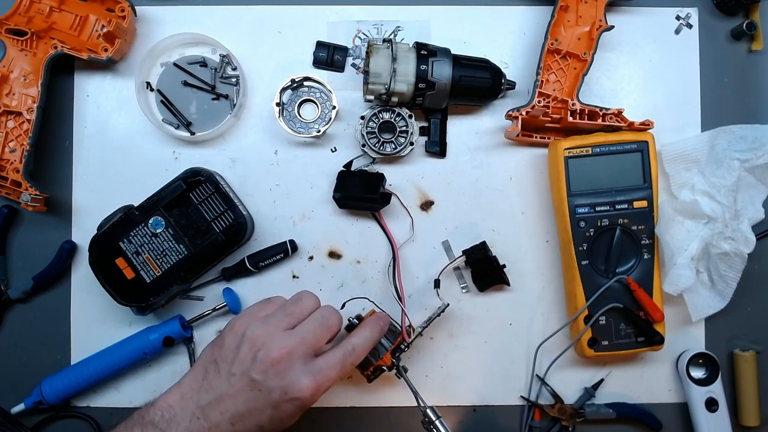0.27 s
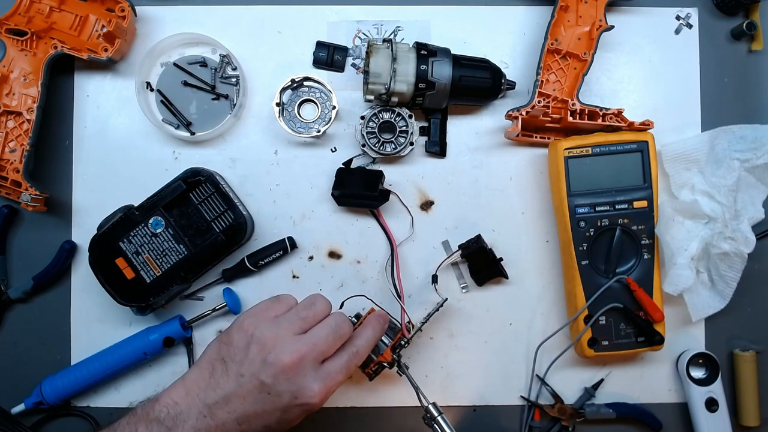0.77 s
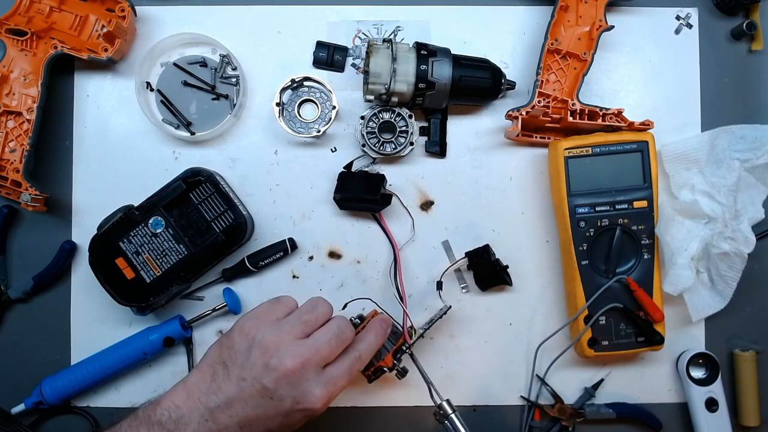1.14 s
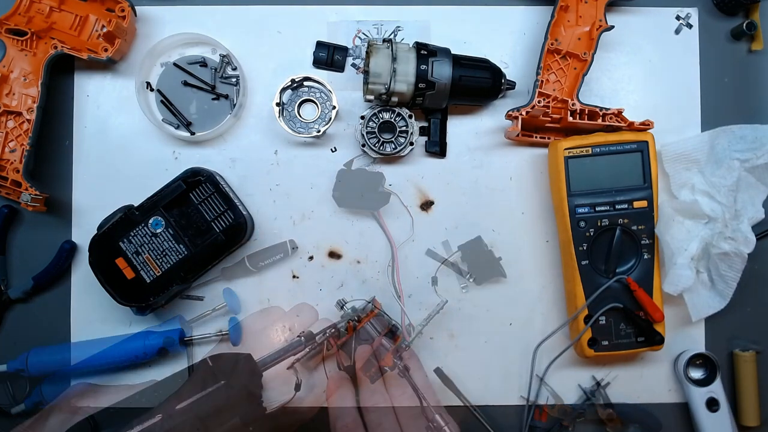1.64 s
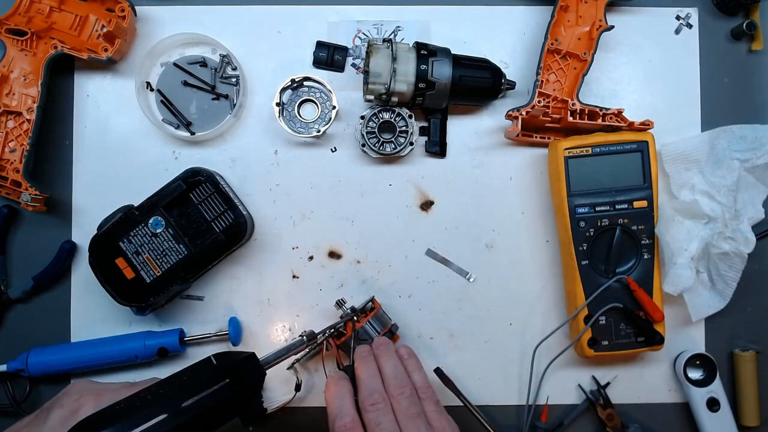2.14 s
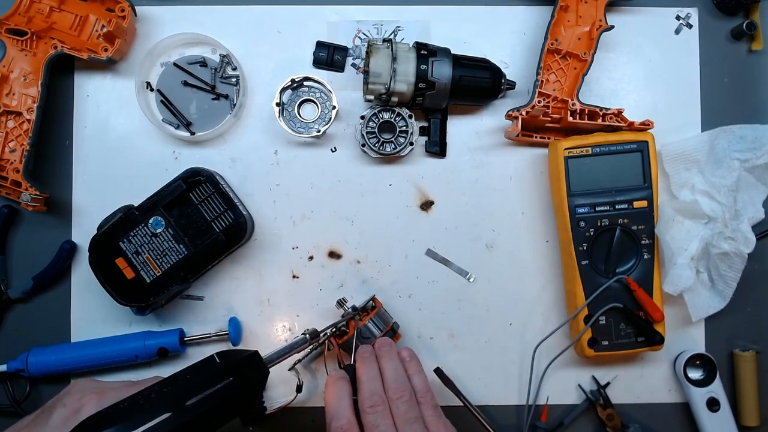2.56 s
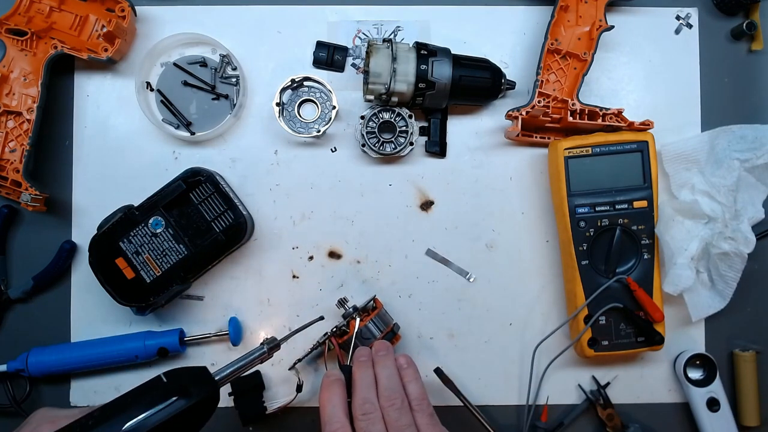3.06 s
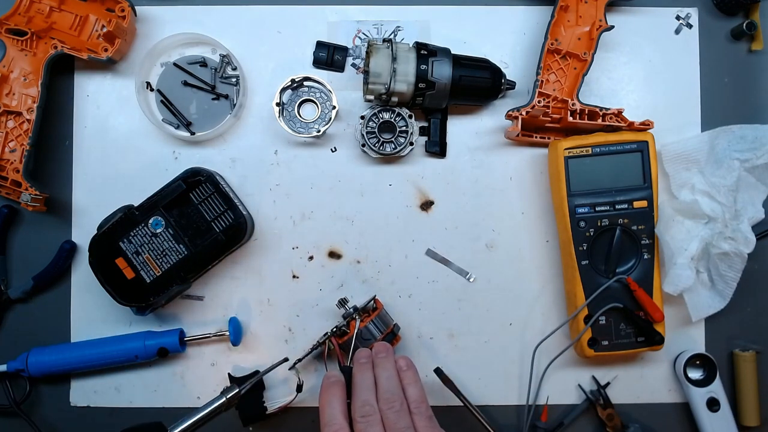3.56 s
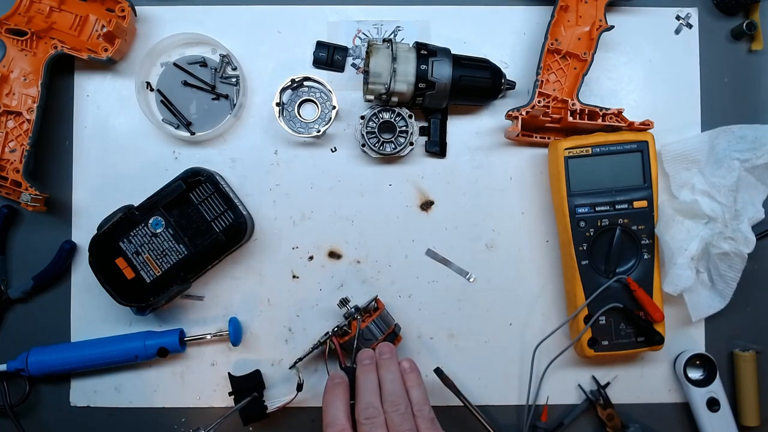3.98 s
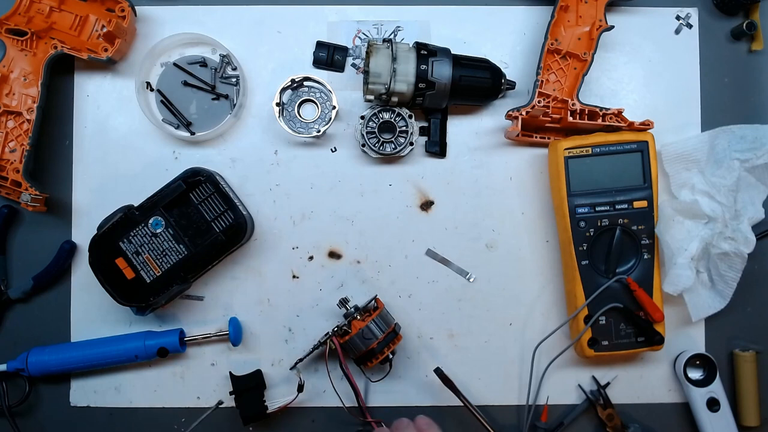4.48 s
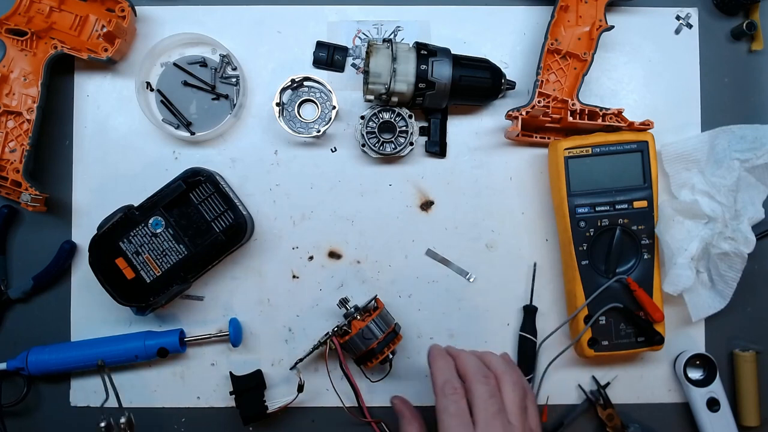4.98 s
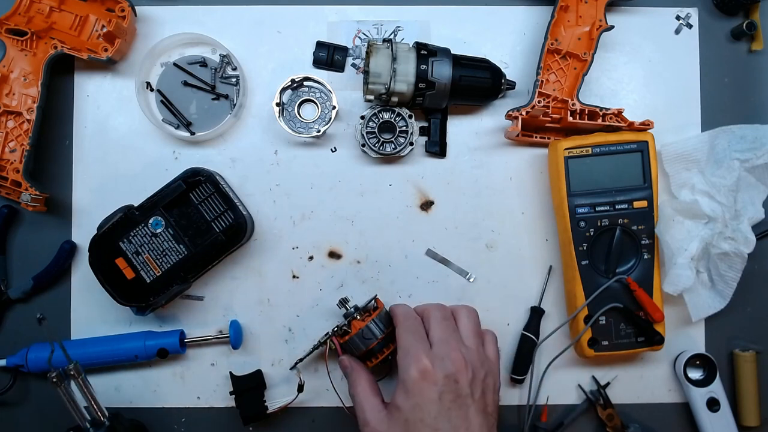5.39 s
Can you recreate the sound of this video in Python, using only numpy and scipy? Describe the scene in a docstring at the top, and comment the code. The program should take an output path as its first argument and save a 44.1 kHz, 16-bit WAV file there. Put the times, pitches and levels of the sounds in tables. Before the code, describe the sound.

A close, nearly centred stereo pickup above a workbench in a small, briefly reverberant workshop. Quiet room air and a wandering low rumble run throughout, with a very faint high whine that drops at 1.7 s. A slight slide opens; small tools click on a metal motor part at 0.25 s, fainter at 0.35 and 0.65, then brighter with a light knock near 1.0. Two soft dull knocks come at 1.8, and a click with short squeaky slides around 2.1. It is mostly quiet from 2.4 to 4.0, then a soft scrape leads to a crisp double click at 4.26-4.29. At 4.61 a short rush ends in a hard, loud slam with rapid bounces, brief ringing and weakening knocks. A small tap follows at 4.87, then heavy, low bench booms at 5.14 and 5.38-5.42 with clatter and clicks, ending in a scraping slide near 5.6.

```python
"""Work with small tools at a bench in a small workshop, heard by two spaced microphones above the bench.
Filtered noise gives room air and rumble, sines a thin whine that drops at 1.67 s; hands slide things (resonant noise).
Soon small tools click on a metal motor part (noise bursts, damped modes) and light knocks bend the bench.
At 4.61 s a heavy tool is set down: a short rush of noise, a hard slam with quick bounces, later weaker knocks.
Then more tools are put down and the bench top booms (damped modes, clatter), with more clicks and a last slide."""
import sys
import numpy as np
from scipy import signal
from scipy.fft import rfft, irfft
from scipy.io import wavfile

SR = 44100
rng = np.random.default_rng(int(sys.argv[2]) if len(sys.argv) > 2 else 0)


def store_wav(level_fs):
    """Save 16-bit WAV to argv[1]."""
    pcm = np.round(np.clip(np.atleast_2d(level_fs), -1, 1) * 32767)
    wavfile.write(sys.argv[1], SR, pcm.T.astype(np.int16))


N = 248283
TIME = np.arange(N) / SR
AGE = TIME[:SR // 2]  # time since a blow, s

# room air: pitch_hz, relative density_db (per Hz)
AIR_SHAPE = [(12, -25.5), (20, 2), (53, -9.5), (77, -25.5), (110, -14), (134, -18.5), (216, -23),
             (262, -19), (574, -26), (897, -33), (976, -33.5), (2140, -37.5), (3250, -44), (6540, -48.5),
             (16000, -69)]
# low rumble, level over time: time_s, level_db (before its wander)
RUMBLE_LEVEL = [(0, -57), (1.0, -58), (1.4, -70), (2.1, -57.5), (2.6, -55), (3.4, -69.5), (4.0, -57.5)]
# low rumble, tone: pitch_hz, relative level_db
RUMBLE_SHAPE = [(15, -6.5), (30, 3.0), (60, -1.0), (105, -4.5), (160, -20), (400, -52), (1500, -78.5)]
# electrical whine: pitch_hz, level_db (at the start)
WHINE_LINES = [(8000, -86), (12000, -97)]
# things slid over the bench, squeaking when the resonance is narrow:
# middle_s, length_s, level_db, resonance_hz, nominal width_hz
SLIDE_STROKES = [(0.012, 0.091, -54, 1110, 438), (1.578, 0.12, -57, 466, 33.2),
                 (1.796, 0.048, -61.5, 1720, 180), (2.122, 0.072, -53.5, 673, 120),
                 (2.15, 0.058, -49, 1045, 74.6), (2.353, 0.06, -70.5, 2100, 900),
                 (3.6, 0.3, -78, 2000, 1210), (4.04, 0.26, -58.5, 690, 480),
                 (4.11, 0.17, -51.5, 296, 129.5), (4.529, 0.21, -60.5, 948, 200),
                 (4.879, .018, -43, 850, 350), (5.021, .12, -54, 1034, 200.3), (5.282, 0.34, -57, 990, 600),
                 (5.45, 0.5, -62, 2600, 1300), (5.62, 0.16, -46.5, 1060, 424)]
# the workshop's reverberation: pitch_hz, level_db, t60_s
ROOM_TAIL = [(98.6, -11, 0.17), (297, -4, 0.21), (1000, -3.5, 0.35), (2540, -6, 0.31), (5470, -5.5, 0.31),
             (13800, -11, 0.27)]
# small tools touching: start_s, level_db, middle_ring_hz, low_ring_hz,
# low_ring_db and crack_db (both relative to level_db, before the layer trims)
TOOL_TOUCHES = [(0.121, -73, 1810, 1220, 6, 13), (0.251, -28, 2040, 1220, -3, -3.5),
                (0.336, -43, 2350, 1000, -4, 5.5), (0.651, -50.5, 1660, 930, -16, -3.5),
                (0.974, -23.5, 2056, 1137, -9, -13.5), (0.988, -37.5, 1470, 940, 2.5, 7),
                (1.048, -58, 1610, 1000, -10, 13), (2.105, -32, 1680, 1050, -6.5, .5),
                (2.702, -54, 1330, 1090, 4, -12), (4.096, -45, 1390, 975, -4, -1),
                (4.259, -19.5, 1420, 1250, -15, -4.5), (4.288, -17, 1385, 1300, -23, -1),
                (4.975, -53, 1680, 1024, 13, -11), (5.066, -40, 1646, 1060, -19.5, -11),
                (5.125, -45.5, 1580, 1110, 8.5, 0.5), (5.143, -27.5, 1640, 840, -5, -1),
                (5.367, -31.5, 1730, 1074, -3, -16), (5.376, -33, 1610, 983, .5, -8.5),
                (5.420, -28, 1410, 870, -4, -6.5)]
# where the hands work: time_s, right_lead_ms (how much earlier the right microphone hears it)
HAND_PLACE = [(0, -0.042), (1, -0.015), (2.1, 0.029), (4.2, 0.059), (5.6, 0.064)]
# what every small contact rings with: pitch_hz, relative level_db
CLACK_SHAPE = [(200, -18), (700, -8.5), (950, -1.5), (1400, -6.5), (2150, 0), (2800, -3.5), (5000, -14.5),
               (12000, -30.5)]
# sharp edge of a touch, also the scratch of a slide: pitch_hz, relative level_db
TOUCH_CRACK_SHAPE = [(600, -40.5), (2200, -16.5), (3000, -0.5), (3700, 1.5), (4600, -1.5), (5600, -4.5),
                     (7000, -9), (8500, -15), (10000, -16), (12500, -20), (15500, -27)]
# the metal motor part and the tool against it: pitch_hz (before detuning), relative level_db, t60_s
METAL_MODES = [(1029.6, 0.5, 0.16), (1090, -5, 0.07), (1304, -3.5, 0.042), (1420, -3, 0.098),
               (1546, -5.5, 0.12), (1710, -6.5, 0.24), (1999, -3.5, 0.024), (2190, -7.5, 0.051),
               (2726, -13, 0.25), (2900, -11, .08), (3840, -7.5, 0.098), (4400, -14, 0.09),
               (4960, -12.5, 0.07), (5450, -11, 0.057), (5830, -11.5, 0.069), (6400, -17, 0.078)]
# blows on the bench top: start_s, level_db, contact_ms
BENCH_BLOWS = [(0.253, -44, 2.9), (0.986, -33, 3.77), (1.787, -33.5, 5.4), (1.805, -33, 4.1),
               (2.105, -35.5, 3.8), (4.289, -43, 2), (4.873, -36, .5), (5.142, -11, 1.92), (5.149, -5, 3.4),
               (5.384, -0.5, 10.25), (5.419, -5.5, 1.69)]
# bench top modes: pitch_hz, relative level_db, t60_s
BENCH_MODES = [(36, -14, 0.33), (50, -7.5, 0.12), (111.6, -0.5, 0.15), (118, -18, 0.046), (162, -13, 0.24),
               (190, -11, 0.13), (226.7, -6, 0.2), (279.3, -8.5, 0.13), (327.8, -7.5, 0.15),
               (378.6, -13.5, 0.22), (445, -19.5, 0.23), (531.6, -16.5, .18), (560, -25, 0.14),
               (674, -19.5, 0.1)]
# loose things clattering on the bench: pitch_hz, relative level_db
CLATTER_SHAPE = [(30, -20.5), (90, -6.5), (250, -5), (400, -6.5), (700, -4.5), (1200, -11), (2000, -19.5),
                 (4000, -32)]
# ringing body of the heavy tool: pitch_hz, relative level_db, t60_s
HEAVY_MODES = [(323, -11, .18), (404, -17, .2), (528, -12, .2), (775, -7, .1), (803, 0, .15),
               (950, -6, .08), (992, 1, .15), (1100, -10, .22), (1255, -7, .2), (1408, -2, .17),
               (1585, -6, .2), (1705, -7, .16), (1772, -9, .18), (1961, -6, .16), (2100, -9, .16),
               (2820, -17, .12), (5730, -21, .16), (6050, -20, .15), (7040, -23, .16)]
# dull noise of the heavy tool's rush and blows: pitch_hz, relative level_db
HEAVY_BODY_SHAPE = [(80, -16), (230, -2), (450, -5.5), (750, -0.5), (1100, -2.5), (1600, -4), (2200, -11.5),
                    (3500, -22.5), (7000, -37.5), (15000, -44)]
# sharp crack of the heavy tool's blows: pitch_hz, relative level_db
HEAVY_CRACK_SHAPE = [(800, -9), (2500, 10), (4200, 2), (5600, 9.5), (7000, 6), (8300, -5), (10500, 1.5),
                     (13000, -4.5), (16000, -5.5)]

MIC_SPACING_M = 0.093
RUSH_S, SLAM_S = 4.6128, 4.6313  # the heavy tool's rush of noise begins, the slam ends it


def undb(db):
    """Decibels to gain."""
    return 10 ** (np.asarray(db) / 20)


def unit(x):
    """Scale to rms 1."""
    return x / np.sqrt(np.mean(x ** 2))


def unit_attack(x):
    """Scale a blow so that its first 6 ms have rms 1."""
    return x / np.sqrt(np.mean(x[..., :SR * 6 // 1000] ** 2))


def along(hz, points, column=1):
    """Read a table on a log-frequency axis."""
    points = np.array(points)
    return np.interp(np.log(hz + 1e-6), np.log(points[:, 0]), points[:, column])


def colour(x, points):
    """Causal minimum-phase filter with the given (pitch_hz, level_db) shape."""
    size = 2048
    gain = undb(along(np.fft.rfftfreq(size, 1 / SR), points))
    # folding the cepstrum forward puts the filter's energy at its onset
    cepstrum = irfft(np.log(gain))
    cepstrum[1:size // 2] *= 2
    cepstrum[size // 2 + 1:] = 0
    impulse = irfft(np.exp(rfft(cepstrum)))
    x = np.atleast_2d(x)
    return signal.fftconvolve(x, impulse[None], axes=1)[:, :x.shape[1]]


def resonate(x, hz, width_hz):
    """One resonance, gain 1 at its centre."""
    return signal.lfilter(*signal.iirpeak(hz, hz / width_hz, fs=SR), x)


def fade(t60):
    """Exponential decay after a blow: 60 dB in t60 seconds."""
    return np.exp(-np.log(1000) * AGE / t60)


def diffuse(size):
    """Spectra of noise arriving from all sides at two spaced microphones: most alike in the bass."""
    hz = np.fft.rfftfreq(size, 1 / SR)
    likeness = .96 * np.sinc(2 * hz * MIC_SPACING_M / 343)  # speed of sound 343 m/s
    mid, side = rfft(rng.standard_normal((2, size)))
    mid = mid * np.sqrt(1 + likeness)
    side = side * np.sqrt(1 - likeness)
    return hz, (mid + np.array([[1], [-1]]) * side) / np.sqrt(2)


def burst(t60, scatter, right_lead_ms=0):
    """Countless close modes of even strength dying together; a share is scattered by the clutter on the bench."""
    size = 8192
    hz, field = diffuse(size)
    decay = fade(t60)[:size]
    delay_s = np.array([[right_lead_ms / 1000], [0]])  # left, right
    straight = rfft(rng.standard_normal(size)) * np.exp(-2j * np.pi * hz * delay_s)
    mixed = np.sqrt(1 - scatter) * straight + np.sqrt(scatter) * field
    spectrum = rfft(irfft(mixed) * decay)
    # flatten the spectrum so no mode stands out, then restrain the tail again
    return irfft(spectrum / abs(spectrum)) * np.sqrt(decay)


def ring(modes):
    """Damped modes; neighbours in the table swing in opposite directions."""
    total = 0
    for k, (hz, db, t60) in enumerate(modes):
        total = total + (-1) ** k * undb(db) * fade(t60) * np.sin(2 * np.pi * hz * AGE)
    return total


def add(out, s, sound, pan_db=0):
    """Mix a sound into both channels at s seconds; pan_db is left over right."""
    start = int(s * SR)
    part = sound[..., :N - start]
    out[:, start:start + part.shape[-1]] += undb([[pan_db / 2], [-pan_db / 2]]) * part


def background(air_db=-59, wander_db=2.5, wander_per_s=3.4, whine_drop_s=1.67, later_whine_db=-9):
    """Diffuse room noise, a low rumble that wanders in level, and a thin electrical whine that drops away."""
    hz, field = diffuse(N)
    air = undb(air_db) * unit(irfft(field * undb(along(hz, AIR_SHAPE)), N))
    wander = np.interp(TIME * wander_per_s, np.arange(N), rng.standard_normal(N))
    rumble_db = np.interp(TIME, *np.transpose(RUMBLE_LEVEL)) + wander_db * wander
    rumble = undb(rumble_db) * unit(colour(rng.standard_normal(N), RUMBLE_SHAPE))
    whine = sum(undb(db) * np.sin(2 * np.pi * line_hz * TIME) for line_hz, db in WHINE_LINES)
    return air + rumble + whine * undb(later_whine_db * (TIME > whine_drop_s))


def slides(grip_db=2.2, grip_per_s=180, scratch_db=-13):
    """Friction catches and slips unevenly, exciting one resonance and a faint scratch that grows with its width."""
    out = np.zeros((2, N))
    for middle_s, length_s, db, hz, width_hz in SLIDE_STROKES:
        steps = rng.standard_normal(len(AGE))
        grip = undb(grip_db * np.interp(AGE * grip_per_s, np.arange(len(AGE)), steps))
        friction = irfft(diffuse(len(AGE))[1]) * grip
        # two broader resonances in a row give steeper skirts
        body = unit(resonate(resonate(friction, hz, 1.36 * width_hz), hz, 2.0 * width_hz))
        scratch = undb(scratch_db) * width_hz / 400 * unit(colour(friction, TOUCH_CRACK_SHAPE))
        start = max(middle_s - length_s / 2, 0)
        stroke = np.cos(np.pi * np.clip((start + AGE - middle_s) / length_s, -.5, .5))
        add(out, start, undb(db) * stroke * (body + scratch))
    return out


def workshop(dry, first_echo_s=.003, early_db=-5, early_t60=0.043):
    """Direct sound, quick reflections off the bench and shelves, then the room's tail, octave by octave."""
    hz, field = diffuse(len(AGE))
    centres = 62.5 * 2. ** np.arange(9)  # octave bands, Hz
    response = 0
    for centre, weights in zip(centres, np.eye(len(centres))):
        band = irfft(field * along(hz, np.c_[centres, weights]), len(AGE))
        tail, early = fade(along(centre, ROOM_TAIL, 2)), fade(early_t60)
        tail_power = tail ** 2 / np.sum(tail ** 2)
        early_power = (undb(early_db) * early) ** 2 / np.sum(early ** 2)
        envelope = np.sqrt(tail_power + early_power)
        response = response + undb(along(centre, ROOM_TAIL)) * band * envelope
    response = np.pad(response, ((0, 0), (int(first_echo_s * SR), 0)))
    return dry + signal.fftconvolve(dry, response, axes=1)[:, :N]


def metal_modes(strength, metal_db=-14):
    """The motor part's modes for one touch; the place of contact and the grip shift each a little."""
    shifts = rng.standard_normal((len(METAL_MODES), 2)) * [.005, 1.5]  # detune (ratio), level (dB)
    modes = []
    for (hz, db, t60), (detune, place_db) in zip(METAL_MODES, shifts):
        modes.append((hz * (1 + detune), db + place_db + metal_db + along(hz, strength), t60))
    return modes


def tool_clicks(low_db=-5, middle_db=-5, crack_db=-5, low_width_hz=170, middle_width_hz=330, crack_share=0.74,
                ting_hz=5560, ting_db=-9, ting_t60=0.058, scatter=0.23, rise_ms=0.93,
                snap_db=-6, snap_t60=0.0029, pan_db=-0.15):
    """Each touch gives a sharp crack with a brief ting, a clack in two resonances, and sets the metal ringing."""
    out = np.zeros((2, N))
    contact = 1 - np.exp(-AGE[:8192] * 1000 / rise_ms)
    for s, db, middle_hz, low_hz, low, sharp in TOOL_TOUCHES:
        # harder touches rattle longer: the nominal decay doubles every 25 dB
        t60 = 0.044 * 2 ** ((db + 30.5) / 25)
        lead_ms = np.interp(s, *np.transpose(HAND_PLACE))
        sharp_db = sharp + crack_db

        body = colour(burst(t60, scatter, lead_ms), CLACK_SHAPE)
        low_ring = undb(low + low_db) * unit_attack(resonate(body, low_hz, low_width_hz))
        middle_ring = undb(middle_db) * unit_attack(resonate(body, middle_hz, middle_width_hz))
        crack = unit_attack(colour(burst(t60 * crack_share, scatter, lead_ms), TOUCH_CRACK_SHAPE))
        add(out, s, undb(db) * contact * (low_ring - middle_ring + undb(sharp_db) * crack), pan_db)

        # the very first contact is a snap far shorter than the rattle
        snap = unit_attack(colour(burst(snap_t60, scatter, lead_ms), TOUCH_CRACK_SHAPE))
        add(out, s, undb(db + sharp_db + snap_db) * snap, pan_db)

        # a dull touch wakes the low modes, a sharp one the high modes
        modes = metal_modes([(low_hz, low), (middle_hz, 0), (4000, sharp)])
        ting = (ting_hz, sharp_db + ting_db, ting_t60)
        add(out, s, undb(db) * ring(modes + [ting]), pan_db)
    return out


def bench_knocks(clatter_db=-15, clatter_t60=.15, top_db=-2.0, pan_db=-1,
                 rock_db=-28.5, rock_hz=600, rock_width_hz=220, rock_s=.1):
    """A half-sine push bends the bench top and rocks loose parts; a longer, softer push reaches only its lowest modes."""
    out, top = np.zeros((2, N)), ring(BENCH_MODES)
    swell = np.sin(np.pi * np.minimum(AGE / rock_s, 1))
    for s, db, contact_ms in [*BENCH_BLOWS, *heavy_thumps(count=3)]:
        push = np.sin(np.pi * np.minimum(AGE * 1000 / contact_ms, 1))
        jolts = irfft(diffuse(len(AGE))[1])
        clatter = unit(colour(jolts, CLATTER_SHAPE)) * fade(clatter_t60)
        rocking = unit(resonate(jolts, rock_hz, rock_width_hz)) * swell
        response = undb(top_db) * top + undb(clatter_db) * clatter + undb(rock_db) * rocking
        blow = signal.fftconvolve(response, push[None] / push.sum(), axes=1)
        add(out, s, undb(db) * blow, pan_db)
    return out


def heavy_tool(body_t60=0.072, modes_db=-14, rush_db=-31, ting_hz=7300, ting_db=-36, ting_t60=0.055,
               crack_t60=.008, body_lag_s=.002, scatter=.85, pan_db=-1.0):
    """A heavy tool is set down: a touch with a high ting and a rush of noise, a slam with bounces, a ringing body."""
    out = np.zeros((2, N))
    rush = unit(colour(rng.standard_normal((2, len(AGE))), HEAVY_BODY_SHAPE)) * (AGE < SLAM_S - RUSH_S)
    ting = ring([(ting_hz, 0, ting_t60)])
    add(out, RUSH_S, undb(rush_db) * rush + undb(ting_db) * ting, pan_db)

    first_touch = [(RUSH_S, -38, -29)]  # start_s, body_db, crack_db
    for s, body_db, crack_db in first_touch + slam_bounces(count=6) + later_knocks(count=3):
        crack = unit_attack(colour(burst(crack_t60, scatter), HEAVY_CRACK_SHAPE))
        add(out, s, undb(crack_db) * crack)
        # the body answers just after the crack
        body = unit_attack(colour(burst(body_t60, scatter), HEAVY_BODY_SHAPE))
        add(out, s + body_lag_s, undb(body_db) * body, pan_db)

    # the first full blow sets the body ringing
    add(out, SLAM_S, undb(modes_db) * unit_attack(ring(HEAVY_MODES)), pan_db)
    return out


def slam_bounces(count, first_gap_s=.0018, gap_growth=1.18):
    """The slam and its quick bounces, with widening gaps and falling levels: start_s, body_db, crack_db."""
    k = np.arange(count)
    gaps = first_gap_s * gap_growth ** k
    starts = SLAM_S + np.cumsum(gaps) - gaps
    return list(zip(starts, -7.5 - 3 * k, -12.5 - 4 * k))


def heavy_thumps(count, lag_s=.009, gap_s=.071, contact_ms=1.1):
    """Even thumps on the bench top after the slam, each weaker: start_s, level_db, contact_ms."""
    return [(SLAM_S + lag_s + gap_s * k, -27.5 - 2.5 * k, contact_ms) for k in range(count)]


def later_knocks(count, gap_s=.0603, loss_db=8.5):
    """Evenly spaced knocks of the heavy tool after the slam, each weaker: start_s, body_db, crack_db."""
    return [(SLAM_S + gap_s * (k + 1), -26 - loss_db * k, -33.5 - loss_db * k) for k in range(count)]


def scene():
    """Everything on the bench sounds into the same room, over room air, wandering rumble and whine."""
    bench = slides() + tool_clicks() + bench_knocks() + heavy_tool()
    return background() + workshop(bench)


def record(dry, top_hz=16300):
    """Soft saturation rounds the loudest peaks and a steep low-pass cuts the top."""
    low_pass = signal.ellip(8, .2, 70, top_hz, fs=SR, output="sos")
    return signal.sosfilt(low_pass, np.tanh(dry))


dry = scene()
out = record(dry)
store_wav(out)
```